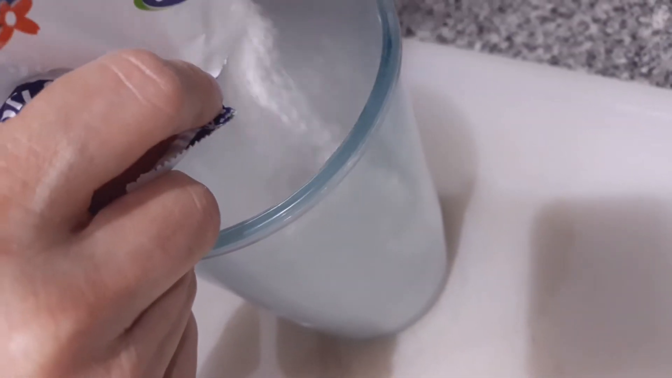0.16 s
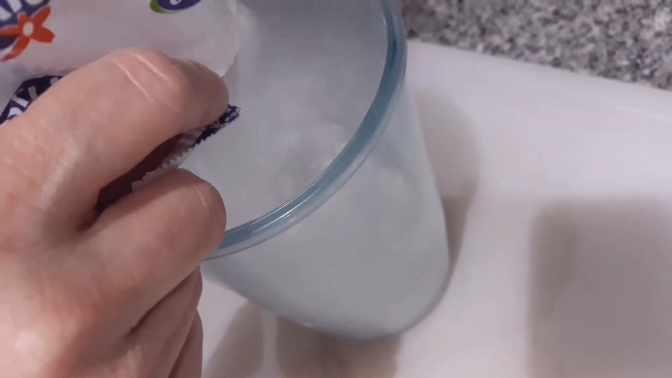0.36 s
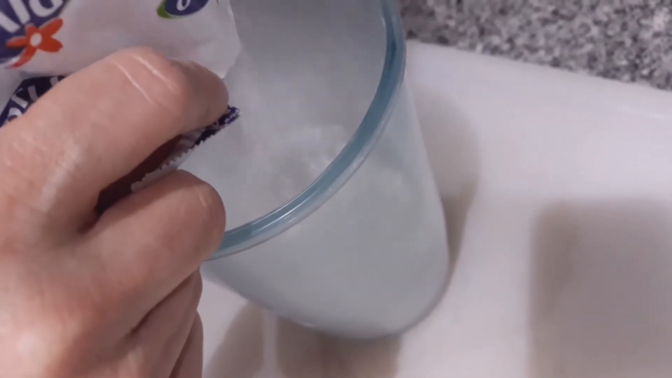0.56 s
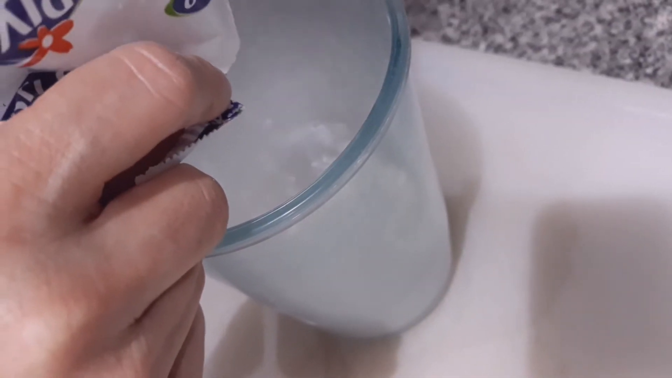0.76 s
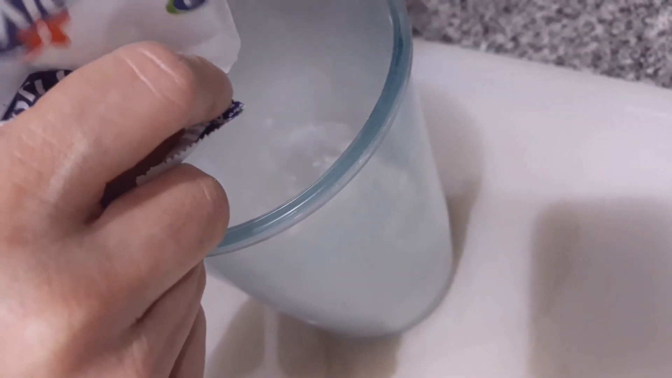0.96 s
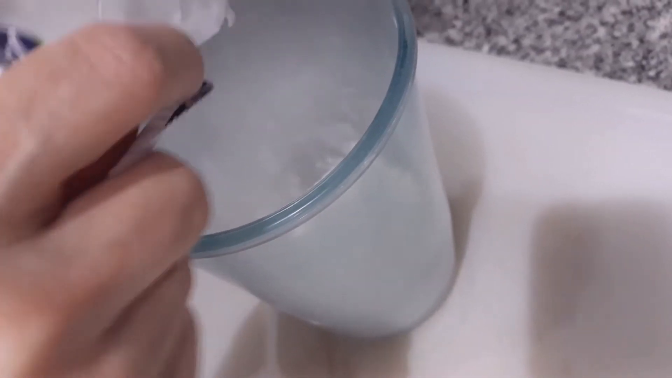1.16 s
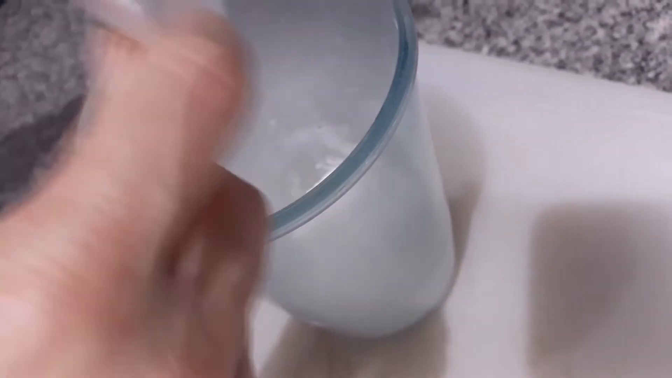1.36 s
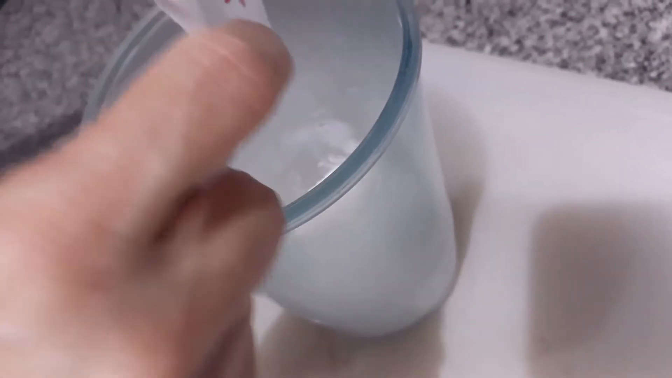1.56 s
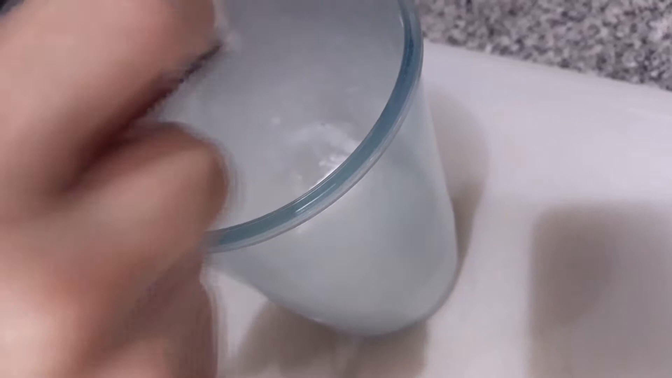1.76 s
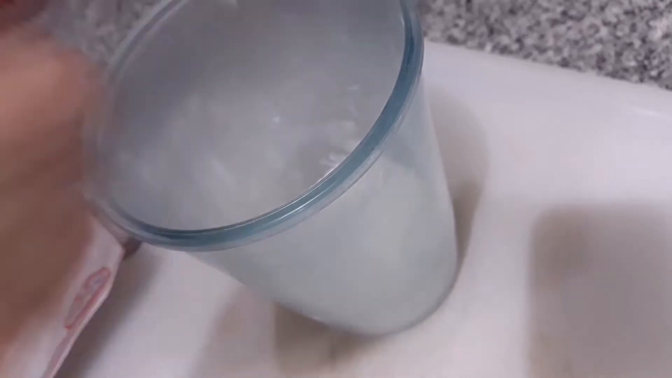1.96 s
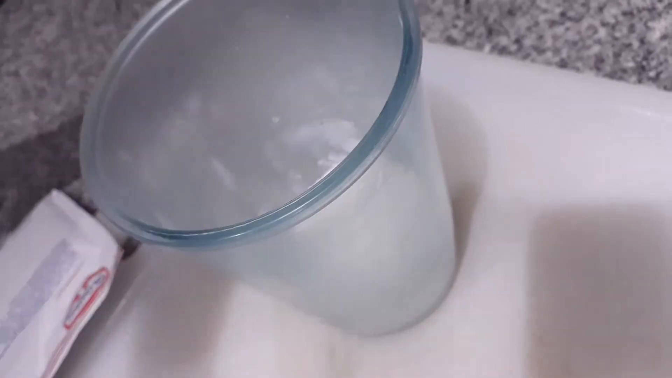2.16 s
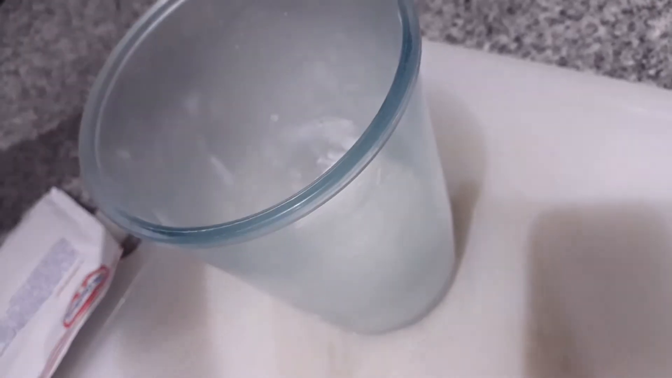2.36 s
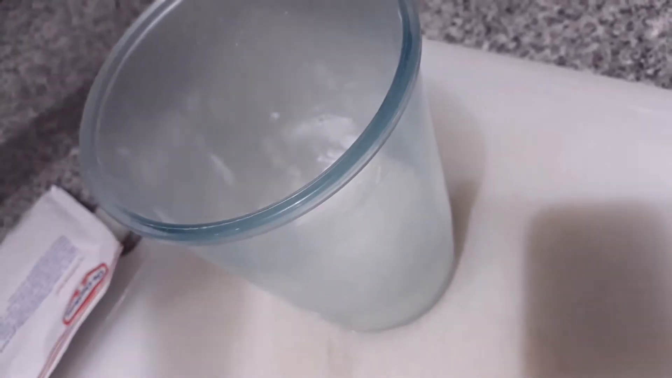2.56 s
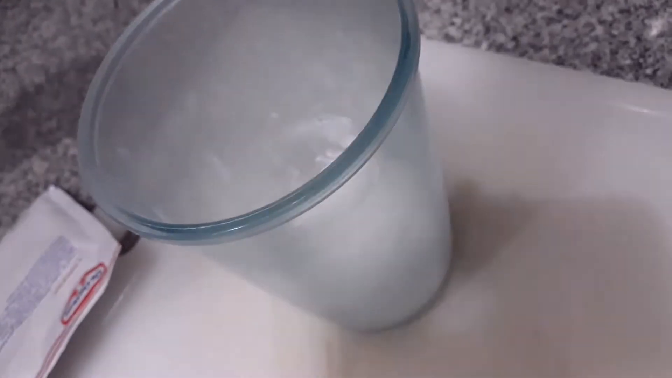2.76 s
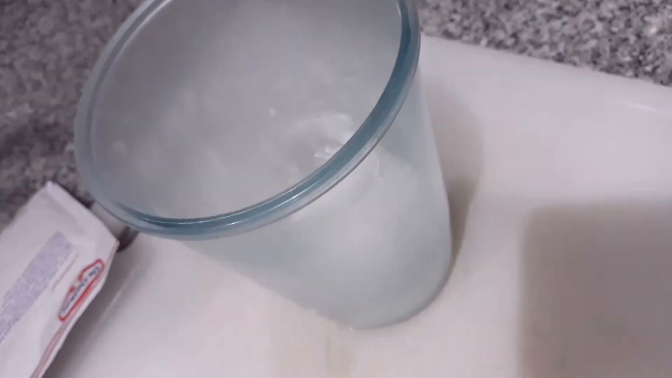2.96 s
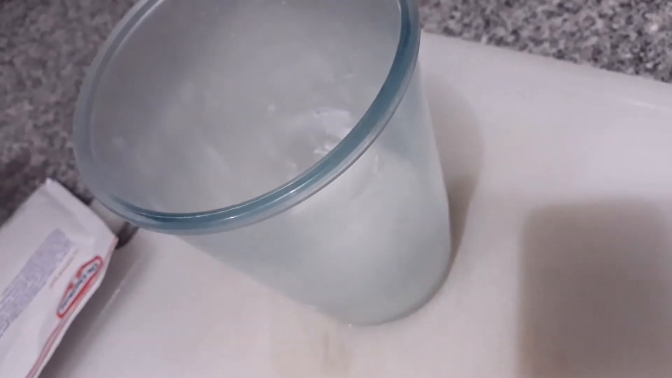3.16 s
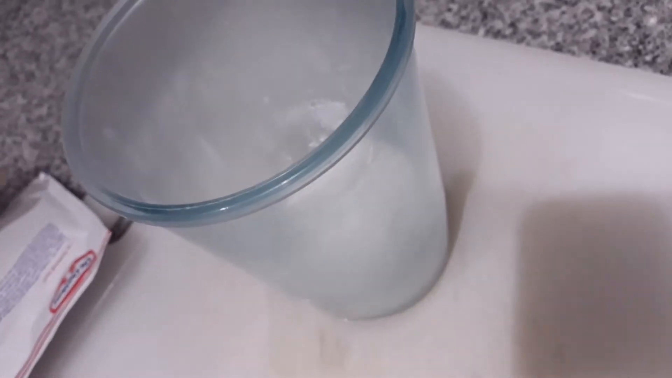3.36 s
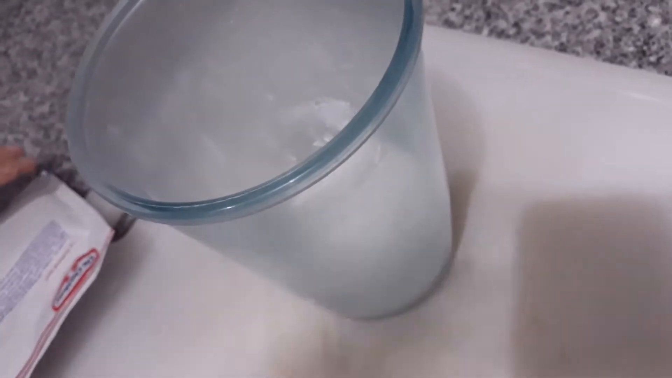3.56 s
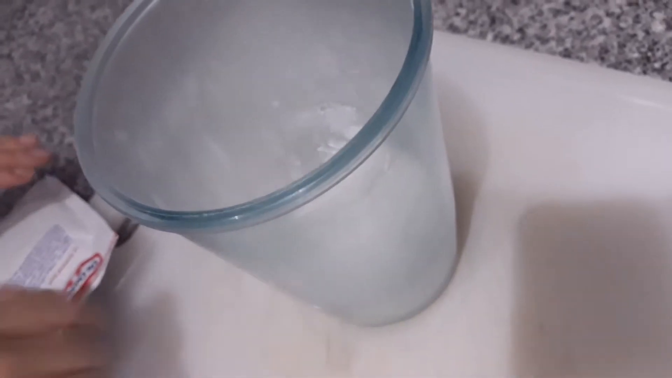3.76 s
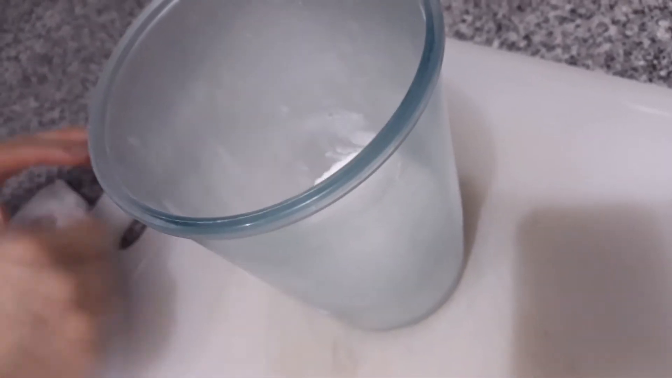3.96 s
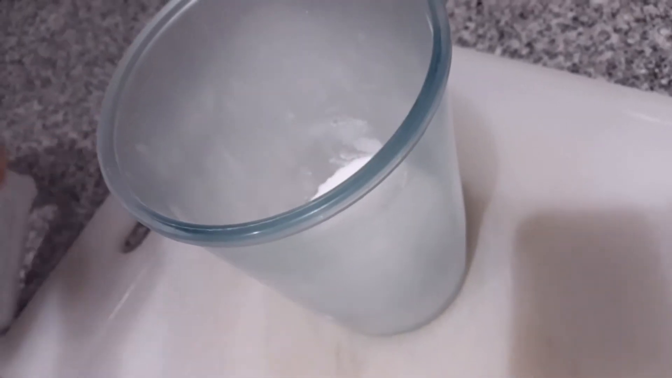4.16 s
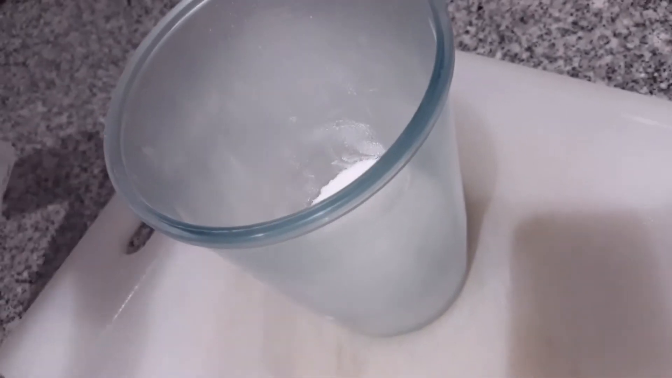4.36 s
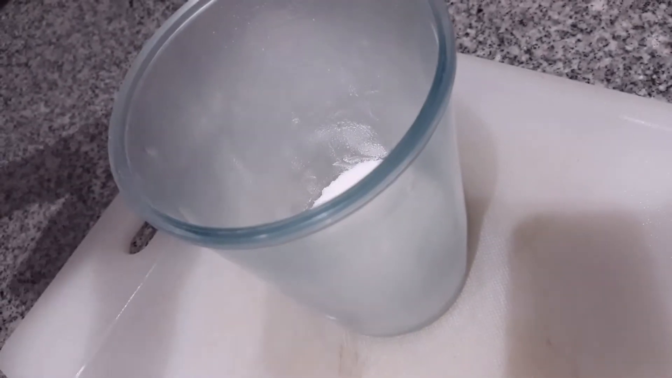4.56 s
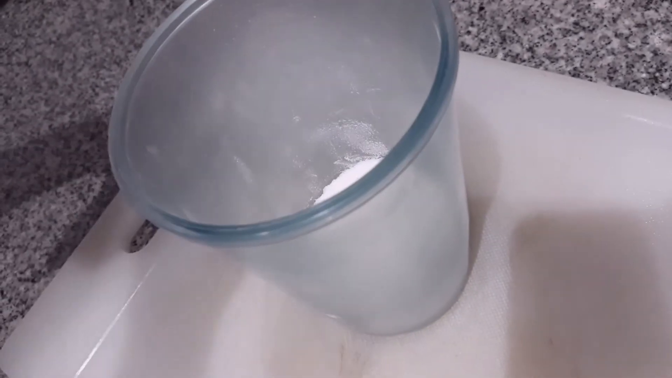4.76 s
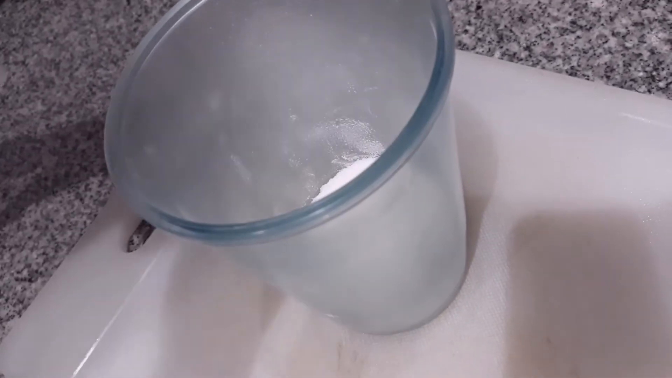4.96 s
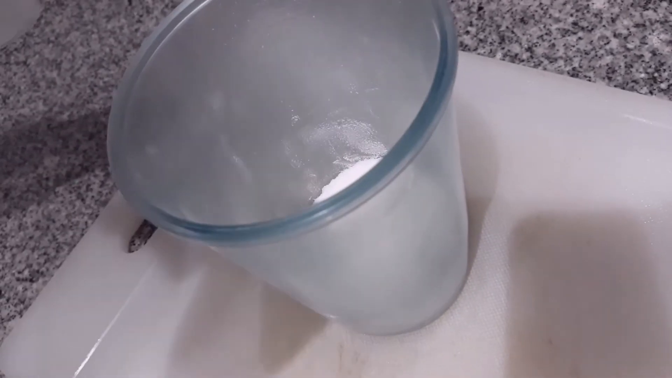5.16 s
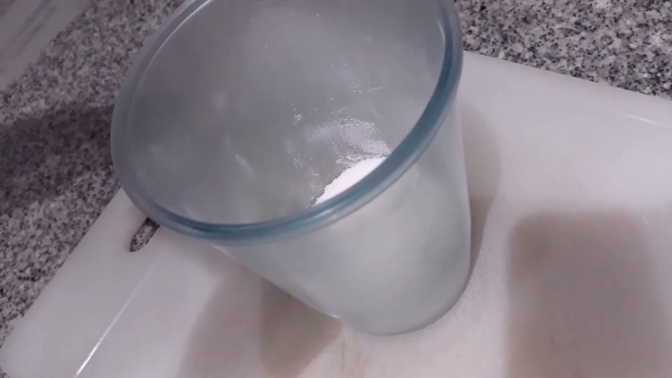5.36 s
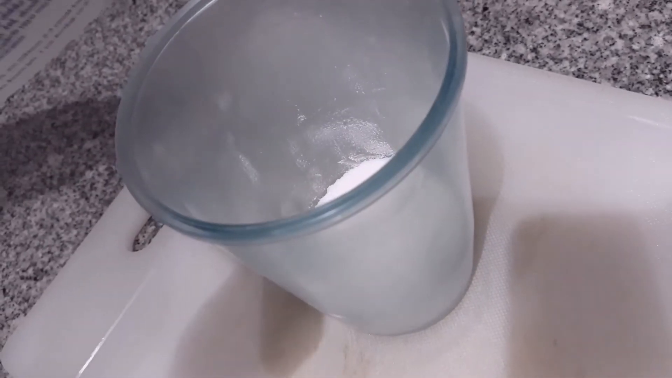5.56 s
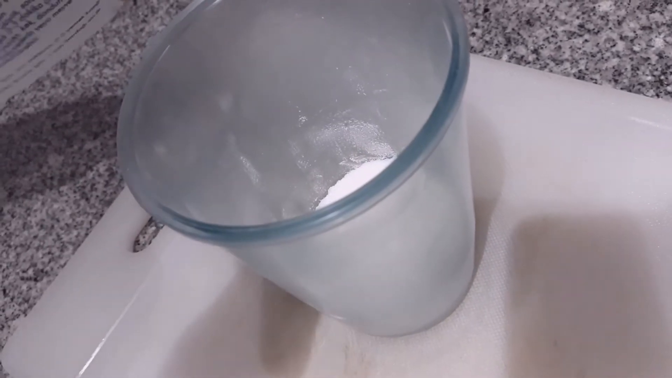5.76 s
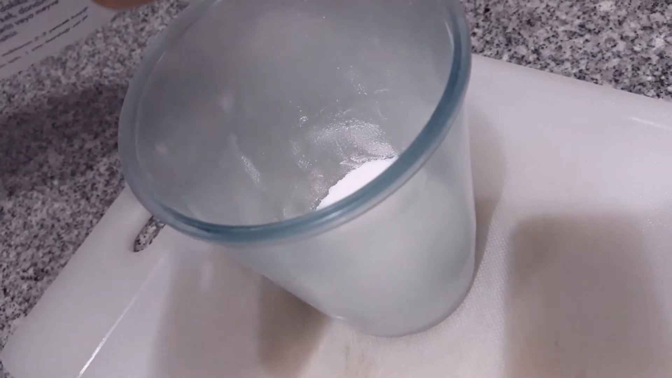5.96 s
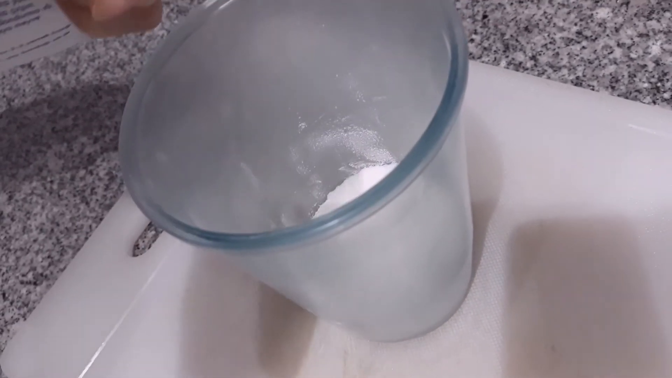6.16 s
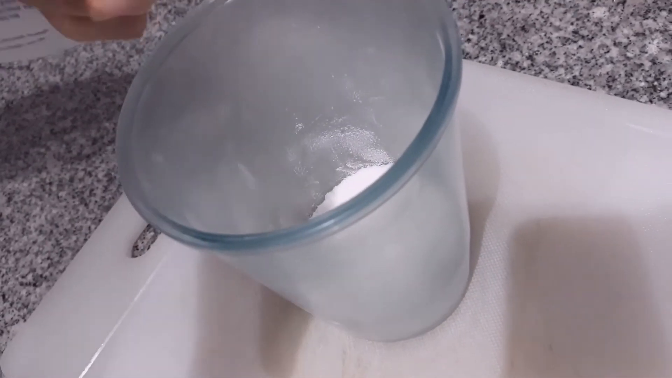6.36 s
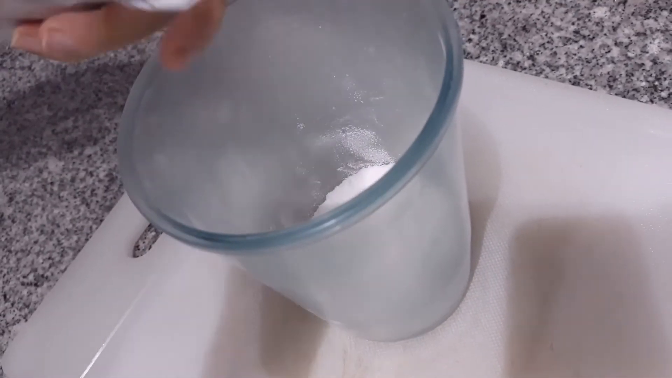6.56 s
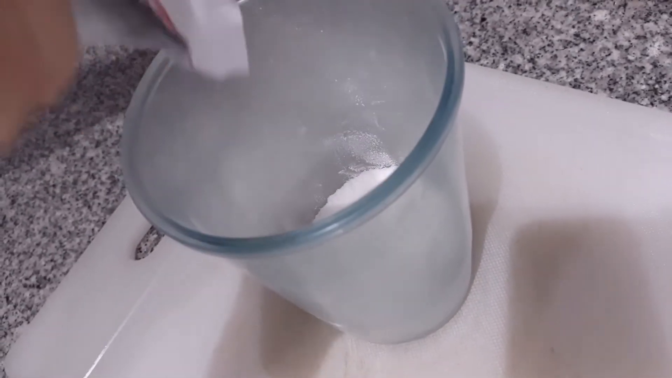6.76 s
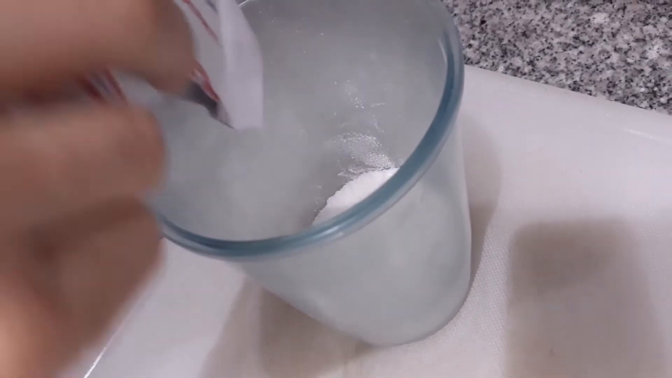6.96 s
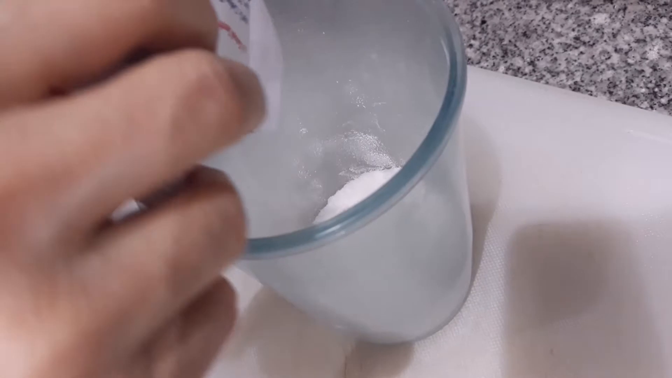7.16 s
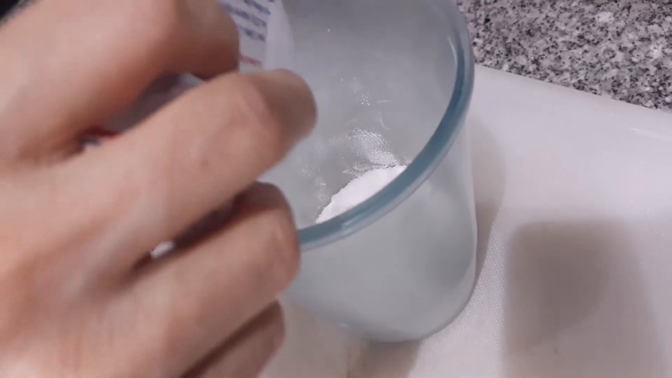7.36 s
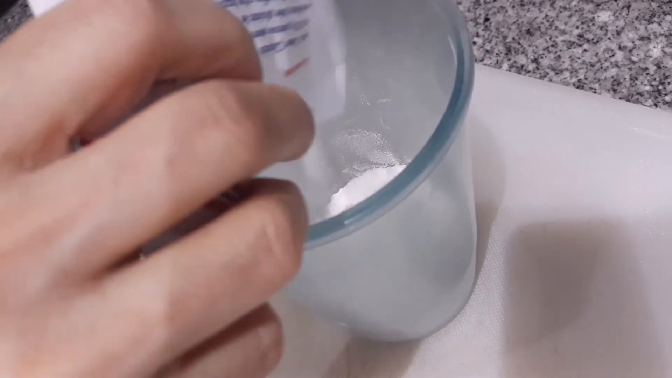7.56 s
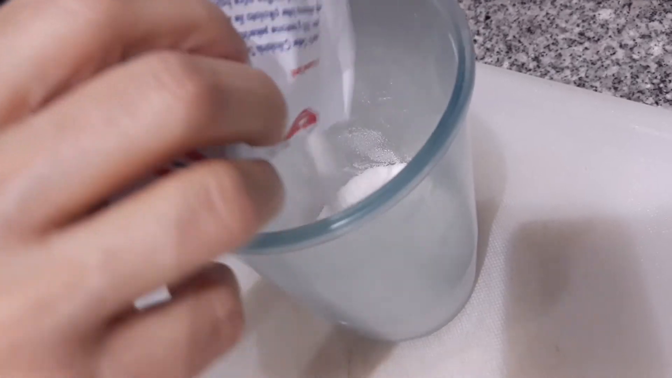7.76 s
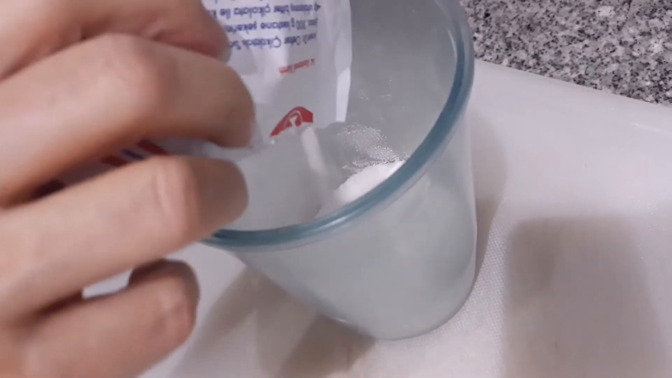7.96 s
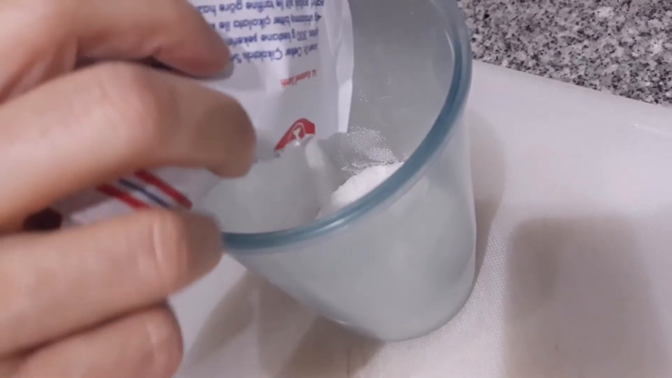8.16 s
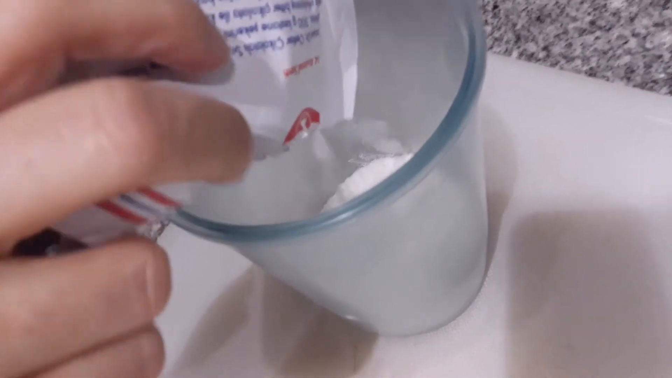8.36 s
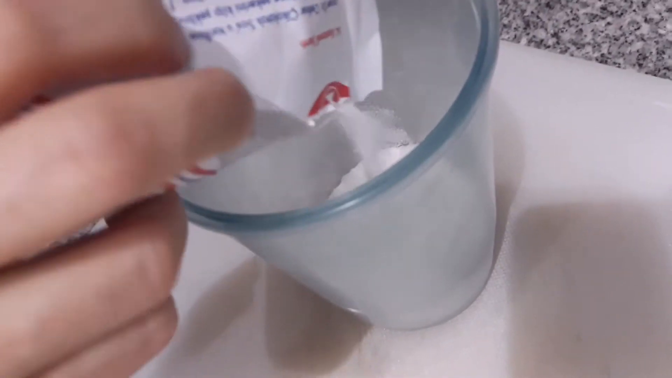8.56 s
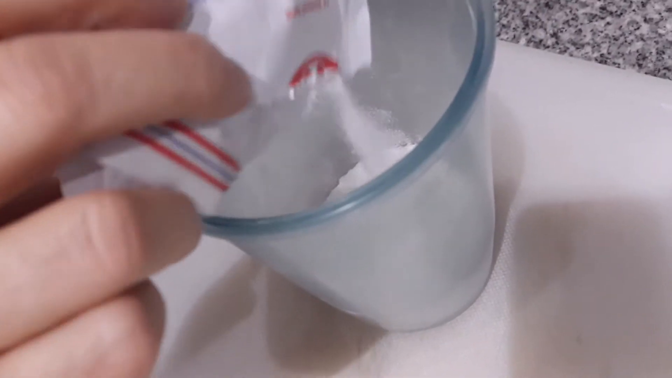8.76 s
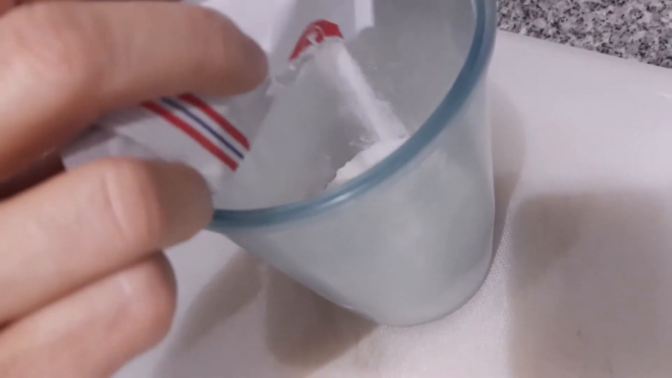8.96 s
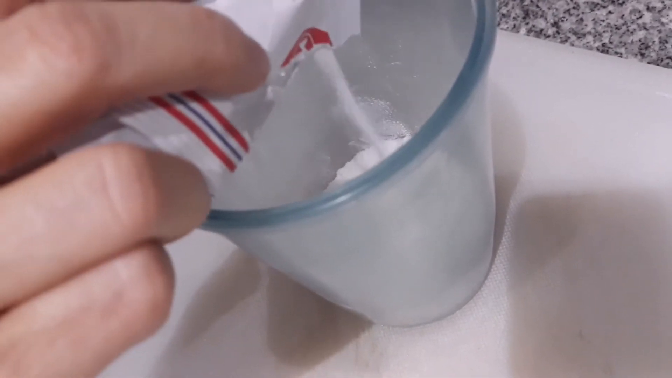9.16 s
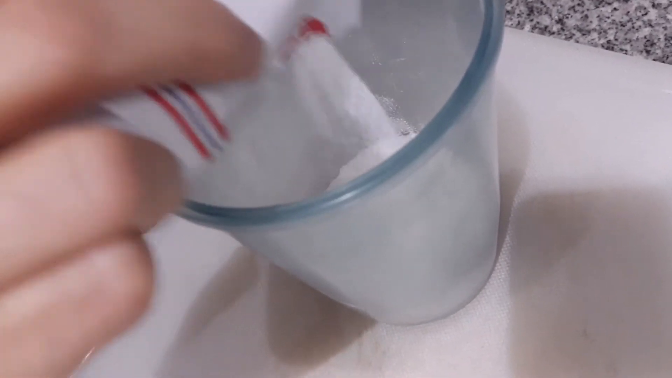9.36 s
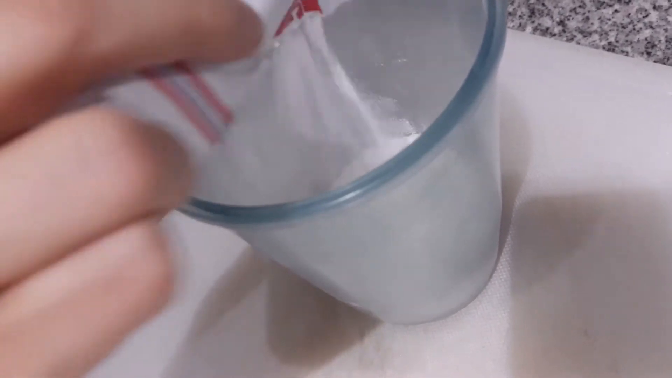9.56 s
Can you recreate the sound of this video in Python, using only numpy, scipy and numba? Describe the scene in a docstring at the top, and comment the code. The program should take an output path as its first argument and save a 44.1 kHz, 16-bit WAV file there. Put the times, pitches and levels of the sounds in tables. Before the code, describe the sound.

A foil packet crackles sharply over a glass, drops on a board, then a paper sachet is torn and powder hisses out, over fridge hum.

```python
"""Creases of a foil packet and a paper sachet buckle in single snaps, while fibres and powder slide in dense tiny
grains. The packet is shaken empty over a tall glass and dropped on the counter; the sachet is picked up, torn open
and tipped in. Noise bursts make the snaps, random ticks and shivers the sliding, and resonances the air in the
glass and the board. A small kitchen answers with echoes made of noise, over a humming fridge and a dull background."""
import sys
import numpy as np
from scipy import signal
from scipy.fft import rfft, irfft
from scipy.io import wavfile
from scipy.ndimage import uniform_filter1d
from numba import njit

SR = 44100
rng = np.random.default_rng(int(sys.argv[2]) if len(sys.argv) > 2 else 0)


def inscribe(sig):
    """Save sig as 16-bit PCM at rate SR to the path in sys.argv[1].

    A 1-D sig is mono; a 2-D sig holds one channel per row.
    Samples are clipped to [-1, 1] before scaling.
    """
    pcm = np.round(np.clip(np.atleast_2d(sig).T, -1, 1) * 32767)
    wavfile.write(sys.argv[1], SR, pcm.astype(np.int16))


N = 423360
TIME = np.arange(N) / SR

# Colour of the kitchen background. Each row: frequency in Hz, relative level in dB.
KITCHEN_COLOUR = [(25, -30), (55, -23.5), (80, -7.5), (150, -11.5), (175, -21.5), (215, -16), (300, -17),
                  (400, -38.5), (500, -25), (650, -43), (830, -32.5), (1100, -48), (2500, -49.5),
                  (16000, -47)]
KITCHEN_DB = -56.5
# Loudness of the fridge hum. Each row: time in seconds, level in dB.
HUM_LEVEL = [(0, -52.5), (1.2, -52), (1.9, -55.5), (3.9, -49.5), (9.6, -51)]
HUM_HZ = 99.2
# How long the kitchen lingers. Each row: frequency in Hz, time to fall by 60 dB in seconds.
ROOM_DECAY = [(150, 0.4), (600, 0.17), (2000, 0.23), (5000, 0.25), (15000, 0.1)]
# Fingers and packet dragging on the board. Each row: middle in seconds, length in seconds, resonance in Hz,
# level in dB before the swell.
BOARD_DRAGS = [(3.045, 0.16, 772, -68), (4.136, 0.11, 770, -47.5), (4.181, 0.063, 800, -38),
               (4.448, 0.18, 617, -43.5), (4.65, 0.062, 830, -54), (4.819, 0.1, 317, -48),
               (5.012, 0.044, 820, -38), (7.795, 0.04, 570, -47)]
# Hand and packet bumping the board. Each row: time in seconds, peak in dB, length of the push in ms.
BOARD_BUMPS = [(0.085, -36, 1.2), (0.297, -32, 2.2), (.492, -32.5, 5.15), (.685, -38.5, 5.2),
               (.703, -32, 1.3), (1.261, -48.5, 1.4), (3.247, -37.5, 2.07), (3.433, -28, 1),
               (3.441, -17, 0.89), (3.472, -25, 0.44), (3.496, -29, 2), (4.157, -23, 0.75),
               (4.471, -36, 2.1), (4.537, -28.5, 1.4), (4.657, -40, 2.3), (4.788, -32.5, 2.8),
               (7.199, -33.5, 1.5), (7.448, -29.5, 1.65), (7.586, -23, 0.8)]
# Cutting board, damped by the counter. Each row: frequency in Hz, relative level in dB.
BOARD_MODES = [(145, -9.5), (205, -7), (236, -9.5), (323, -2), (484, 4), (608, 0.5), (820, -12.5)]
# Air column in the glass. Each row: frequency in Hz, width in Hz, level in dB.
GLASS_MODES = [(565.8, 37, 16.5), (1180, 130, 1.5), (1698, 64, 8), (1993, 130, -15), (2780, 520, 2.5),
               (4600, 1700, 1)]
# Creases buckling. Each row: time in seconds, panel resonance in Hz, level in dB,
# then body and edge in dB relative to that level.
CREASE_SNAPS = [(0.0595, 4030, -50.5, -9, -8), (.084, 4330, -26.5, -1.5, -7.5), (.1045, 825, -53, 11, -8),
                (0.1192, 2050, -39, 5, -13), (.2054, 7700, -43, -23, 3.5), (0.2193, 1260, -32.5, 5.5, -18),
                (.276, 2110, -48, 5, -11), (0.2972, 8750, -26, -9, -3), (0.3189, 1960, -31.5, 4, -7),
                (.3383, 1720, -46, 8.5, -10), (.371, 4390, -39.5, -4, -2), (.491, 2200, -37, 6.5, -17),
                (0.508, 1210, -34, 5.5, -11), (0.5443, 3570, -29.5, 0, -29), (0.7033, 8700, -15, -1, -3.5),
                (0.8867, 4800, -19.5, -7.5, -14), (0.9092, 1200, -37, 2, -8), (1.0167, 8760, -52, -1.5, 4),
                (1.052, 6960, -49, -3.5, 0), (1.0997, 1120, -39, 10.5, -15), (1.222, 8150, -48, -18, 6.5),
                (1.2368, 9150, -26, -4, -4), (1.2601, 2200, -21, -2, -20),
                (1.2683, 4160, -18.5, -11.5, -10), (1.2995, 5160, -24, -9, -2),
                (1.3122, 1700, -28.5, 5.5, -22), (1.3711, 4230, -24, -2, -11),
                (1.3798, 2560, -26.5, -3, -14), (1.3891, 4130, -34, -3, -10), (1.4058, 3600, -26, -9, -13),
                (1.4421, 4300, -30, 0, -5), (1.5334, 2400, -46, 3.5, -18), (1.561, 4300, -46.5, 2.5, -22),
                (1.6494, 5380, -53, -10, -2.5), (1.7373, 2450, -45, 4.5, -10),
                (1.7758, 6500, -38.5, -13, -6.5), (1.8146, 8140, -54.5, 0.5, 4),
                (1.956, 1570, -47.5, 6, -28), (1.972, 1570, -52.5, 6, -23), (2.0333, 1130, -55.5, 9, -26),
                (2.116, 2410, -50.5, -6, -10), (2.2561, 1734, -60, 0, -14.5), (2.9294, 8240, -59, -15.5, 9),
                (3.243, 1870, -50, 5, 2.5), (3.4383, 1650, -32, 2, -3.5), (3.4513, 1200, -44, 0, 4),
                (3.47, 1490, -28, 2.5, -5.5), (3.945, 3250, -47.5, 6.5, -13), (3.9986, 8150, -48, 6, 7.5),
                (4.0657, 714, -43, 4.5, -20), (4.1541, 4130, -28, -3.5, -10),
                (4.1789, 4200, -37.5, -10, -2), (4.3785, 3100, -34.5, -6, -22),
                (4.411, 4500, -39.5, -6, -15), (4.4323, 4430, -34.5, -13, -11),
                (4.4694, 4460, -42, -0.5, -7), (4.511, 2090, -54, 6, -14), (4.536, 4800, -28, -3.5, -6),
                (4.6507, 3360, -37.5, 1, -16), (4.658, 2080, -26, -3.5, -9), (4.748, 5140, -42, -5.5, -7),
                (4.7903, 4970, -41.5, -3.5, 2), (5.0075, 3120, -29.5, -2.5, -24),
                (5.076, 2490, -44, -1, -4), (5.2279, 4080, -26, -12.5, -5.5), (5.257, 2390, -36, 4, -8),
                (5.3456, 4700, -21, -2, 0), (5.5131, 4400, -21, -17, -1), (5.6023, 3880, -18, -6.5, -10.5),
                (6.002, 4030, -43, -7, -7), (6.232, 3760, -48, -15, -13), (6.2984, 3280, -41.5, -2, -15),
                (6.3155, 2540, -39.5, 2.5, -3), (6.3525, 3650, -33.5, -9.5, -29),
                (6.3793, 1770, -57, 16, 0), (6.434, 1700, -39, 6.5, -22), (6.446, 2470, -34, -1, -14),
                (6.4882, 4380, -30, -3, -8.5), (7.1964, 2420, -48, 9, -5), (7.4017, 5370, -34, -12, -11),
                (7.449, 2520, -27.5, -1.5, -10.5), (7.5255, 2650, -25.5, -6, -11.5),
                (7.5846, 1620, -25.5, -2.5, -12), (7.5908, 4180, -28.5, -6, -3),
                (7.6292, 1710, -38.5, 8, -7), (7.6465, 4050, -23, -10.5, -6), (7.9106, 2320, -27, -0.5, -3),
                (8.153, 3860, -36.5, -5, -9), (8.3812, 5510, -42.5, -8, -3), (8.4902, 4640, -32, -10, -9),
                (8.525, 4760, -41, -11, -4), (8.569, 7700, -41.5, -5.5, -1), (8.6382, 4650, -39.5, -15, -3),
                (8.7725, 4630, -43.5, -1, -7), (8.871, 5510, -38.5, -8, -4), (8.896, 7000, -34, -3.5, 0.5),
                (8.9152, 3620, -40, -10, 0), (9.0455, 4430, -39, -3, -18), (9.2596, 2180, -38, 2.5, -26),
                (9.5204, 1230, -42.5, 6.5, -5), (9.5356, 1254, -37.5, 2, -7)]
# Thud, hollow, body, hiss and edge of a snap. Each row: lowest and highest frequency in Hz.
SNAP_BANDS = [(200, 450), (470, 850), (1080, 2550), (2500, 6200), (6600, 16000)]
# Body, lower hiss, upper hiss and edge of the sliding. Each row: lowest and highest frequency in Hz.
SLIDING_BANDS = [(470, 2000), (2000, 3700), (3700, 6500), (6500, 16000)]
# Strokes that rub or tear the wrappers. Each row: start of the hold in seconds, hold in seconds, level in dB,
# then body and edge in dB relative to that level.
HAND_STROKES = [(0, .47, -67, 8, 2), (.095, 0.016, -42, 5, -4), (.27, 0.01, -54, 14, -2),
                (0.303, 0.028, -42.5, 4.5, -3), (.482, 0.051, -52.5, 3, -2), (0.869, 0.1, -50, -0.5, -8.5),
                (1.1, 0.14, -51, -3, -6), (1.22, 0.038, -46, -9, 0), (1.269, 0.022, -32.5, -15, -12),
                (1.33, .1, -40.5, -5, -15), (1.733, 0.011, -57, 7.5, -6), (1.82, 0.016, -57.5, 1, -8),
                (1.89, 0.055, -66, -6, 0), (2.48, 0.058, -80, -6, 11.5), (2.93, .05, -72, -3.5, -5),
                (3.11, .1, -77, -6, 0.5), (3.241, .02, -53.5, 2.5, 2), (3.452, 0.034, -45, 7.5, -3),
                (3.56, .01, -56.5, 1, 2), (3.947, 0.17, -45.5, -0.5, -6), (4.152, .03, -42, 0.5, -5),
                (4.2, 0.13, -49, -5, -5), (4.42, 0.18, -49.5, -4, -4.5), (4.632, 0.054, -47.5, 7.5, -8),
                (4.794, 0.05, -50, -0.5, -5), (4.85, 0.086, -56.5, -8, -3), (4.958, 0.1, -46, -8, -2.5),
                (5.03, 0.047, -41.5, -8.5, -2), (5.1, 0.07, -51.5, -3.5, 1), (5.195, 0.074, -41, -11.5, -1),
                (5.29, 0.062, -36.5, -7, -2), (5.358, 0.048, -27, -6.5, -1.5),
                (5.55, .05, -39, -11.5, -3.5), (5.62, .07, -33.5, -12, -2.5), (5.72, 0.12, -48.5, -9, 5),
                (5.832, 0.028, -34.5, -8.5, 0.5), (5.94, 0.018, -47.5, -1.5, -0.5),
                (6.002, .045, -43.5, -12.5, -1.5), (6.202, .03, -59, 2.5, -3),
                (6.246, 0.05, -44.5, -8.5, -4), (6.34, 0.21, -53, -1.5, -3), (7.044, 0.015, -48, -6, -1.5),
                (8.41, 0.036, -45.5, -9.5, -2), (8.76, 0.016, -47, -8, -2), (8.97, 0.042, -45.5, -20, -1),
                (9.219, 0.024, -43.5, -10, -2), (9.457, 0.036, -38, -11, -3)]
STROKE_ATTACK_S, STROKE_RELEASE_T60_S = 0.017, .2
STILL_DB = -89  # faint rustle of a wrapper at rest
# Powder running down the tipped sachet. Each row: time in seconds, then levels of its hiss, body and treble
# in dB, before POUR_DB is added to all three.
POWDER_POUR = [(6.5, -50, -52, -51), (6.59, -45.5, -60, -50), (6.66, -46.5, -69, -49),
               (6.83, -50.5, -67, -47.5), (7.07, -58, -68, -54), (7.22, -49.5, -53, -50),
               (7.38, -47, -53, -46), (7.55, -50, -50.5, -46.5), (7.89, -47.5, -59.5, -46),
               (8.25, -46.5, -60, -48), (8.62, -47.5, -54, -49), (8.86, -45.5, -53, -48),
               (8.99, -49, -55.5, -47), (9.12, -50.5, -57.5, -48.5), (9.28, -47, -56, -46.5),
               (9.5, -57, -71, -62.5), (9.6, -48, -50, -48)]
POUR_DB = -2.5
# What the hands are doing: shaking the foil packet out, putting it down, picking up the sachet, tearing its top
# off, spreading it open, carrying it to the glass, tipping it, the powder starting to run, coaxing out the rest.
# Each row: start in seconds, scatter of grain sizes in dB, share of the glass's resonance, resonance of the bent
# sheet in Hz, flutter's time to fall by 60 dB in seconds, lower hiss in dB relative to the level, small creases
# in dB over the sliding.
HAND_ACTIONS = [(0, 6.5, 0.51, 3100, .03, -3, 6), (1.5, 3, .4, 3600, 0.046, -2.5, 3),
                (3.9, 3, 0.33, 3400, 0.053, -5.5, 6), (5.15, 2, 0.795, 4600, 0.042, -4.5, -9),
                (6.2, 1.5, .4, 3600, 0.031, -2.5, 1), (6.55, -1, 0.24, 5600, .045, -9, -11),
                (7.15, 0, 0.78, 4690, 0.022, -6, 6), (7.95, -1.5, 0.89, 2950, 0.023, -5, 0.5),
                (8.4, 2, 0.64, 4375, 0.03, -4, 3)]
ACTION_BLEND_S = 0.047


def undb(db):
    """Decibels to gain."""
    return 10 ** (np.asarray(db) / 20)


def unit(x):
    """Scale to an average (rms) strength of 1."""
    return x / np.sqrt(np.mean(x ** 2))


def curves(table):
    """Each column of a table, joined by straight lines in time."""
    s, *columns = np.transpose(table)
    return [np.interp(TIME, s, column) for column in columns]


def wander(rate_hz):
    """Random values, rate_hz of them a second, joined by straight lines."""
    return np.interp(TIME * rate_hz, np.arange(N // 100), rng.standard_normal(N // 100))


def fade(t, t60):
    """Exponential decay, 60 dB down after t60 seconds."""
    return np.exp(-np.log(1000) * t / t60)


def band(x, edges, order=3):
    """Keep only the frequencies between two edges."""
    return signal.sosfilt(signal.butter(order, edges, "bandpass", fs=SR, output="sos"), x)


def resonate(x, hz, width_hz):
    """One resonance, gain 1 at its centre."""
    return signal.lfilter(*signal.iirpeak(hz, hz / width_hz, fs=SR), x)


@njit
def glide(x, hz, q):
    """A resonance whose centre moves, gain 1 at the centre."""
    y, b, low = np.empty(len(x)), 0., 0.
    for i in range(len(x)):
        g = np.tan(np.pi * hz[i] / SR)
        v = (b + g * (x[i] - low)) / (1 + g * (g + 1 / q))
        b, low, y[i] = 2 * v - b, low + 2 * g * v, v / q
    return y


def colour(x, points):
    """Shape a sound by (Hz, dB) points."""
    hz, db = np.transpose(points)
    bins = np.maximum(np.fft.rfftfreq(len(x), 1 / SR), 1)
    gain = undb(np.interp(np.log(bins), np.log(hz), db))
    return irfft(rfft(x) * gain, len(x))


def add(track, s, sound):
    """Mix a short sound into a track at time s."""
    start = int(s * SR)
    track[start:start + len(sound)] += sound[:N - start]


def kitchen(waver=0.33, flutter_db=1, octave_db=-17):
    """A fridge hums at twice the mains frequency over a dull, even background."""
    phase = 2 * np.pi * HUM_HZ * TIME + waver * wander(21)
    tone = unit(np.sin(phase) + undb(octave_db) * np.sin(2 * phase))
    hum = tone * undb(curves(HUM_LEVEL)[0] + flutter_db * wander(4.5))
    return hum + undb(KITCHEN_DB) * unit(colour(rng.standard_normal(N), KITCHEN_COLOUR))


def room(x, early_db=-8.5, early_t60=0.061, late_db=-13):
    """Counter and tiles answer at once; then each band's energy lingers in the kitchen as a diffuse wash."""
    t = TIME[:SR // 12]
    echoes = rng.standard_normal(len(t)) * fade(t, early_t60) * (t > .002)
    reflections = unit(echoes) / np.sqrt(len(t))
    out = x + undb(early_db) * signal.fftconvolve(x, reflections)[:N]
    far = np.pad(x, (SR // 120, 0))[:N]  # the wash sets in a little later
    edges = np.geomspace(140, 17000, 15)
    for lo, hi in zip(edges, edges[1:]):
        t60 = np.interp(np.sqrt(lo * hi), *np.transpose(ROOM_DECAY))
        keep = fade(1 / SR, t60) ** 2  # share of the energy left after one sample
        energy = signal.lfilter([1 - keep], [1, -keep], band(far, (lo, hi)) ** 2)
        wash = unit(band(rng.standard_normal(N), (lo, hi)))
        out = out + undb(late_db) * np.sqrt(energy) * wash
    return out


def handling(moving, gain_db=-12, follow=0.38, rest_db=-46):
    """Fingers working the wrapper add a soft low rub that swells with the sliding."""
    rub = unit(band(rng.standard_normal(N), (140, 340)))
    return rub * undb(gain_db + rest_db + follow * (moving[0] - rest_db))


def drags(slips_per_s=400, q=4.3):
    """Skin and paper slip in small uneven jerks that ring one low resonance."""
    out = np.zeros(N)
    t = TIME[:SR // 4]
    for (s, length, hz, db), chance in zip(BOARD_DRAGS, rng.random((len(BOARD_DRAGS), len(t)))):
        slips = (chance < slips_per_s / SR) * 1.
        swell = np.sin(np.pi * np.minimum(t / length, 1)) ** 2
        rung = resonate(resonate(slips, hz, hz / q), hz, hz / q)
        add(out, s - length / 2, undb(db) * swell * unit(rung))
    return out


def bumps(scuff_db=2, scuff_t60=0.028):
    """A soft, scuffing push thuds on the board; the longer the push, the duller the knock."""
    out = np.zeros(N)
    t = np.arange(SR // 4) / SR
    ring = sum(undb(db) * np.cos(2 * np.pi * hz * t) * fade(t, 26 / hz) for hz, db in BOARD_MODES)
    for (s, db, push_ms), noise in zip(BOARD_BUMPS, rng.standard_normal((len(BOARD_BUMPS), len(t)))):
        scuff = undb(scuff_db) * unit(band(noise, (130, 900))) * fade(t, scuff_t60)
        push = np.sin(np.pi * np.minimum(t * 1000 / push_ms, 1)) ** 2
        pushed = signal.fftconvolve(ring + scuff, push)[:len(t)]
        knock = band(pushed, (110, 3000), order=2)
        add(out, s, undb(db) * knock / np.abs(knock).max())
    return out


def glass(x):
    """The air in the glass gives back a sound at its own resonances."""
    return sum(undb(db) * resonate(x, hz, width) for hz, width, db in GLASS_MODES)


def actions():
    """Each column of the hands' actions, held until the next action and blended into it."""
    s, *columns = np.transpose(HAND_ACTIONS)
    current = np.searchsorted(s[1:], TIME)
    return [uniform_filter1d(column[current], int(ACTION_BLEND_S * SR)) for column in columns]


def stroke(t, hold_s):
    """A quick swell up to t = 0, a hold and an exponential release."""
    swell = np.exp(-(np.minimum(t, 0) / STROKE_ATTACK_S) ** 2)
    return swell * fade(np.maximum(t - hold_s, 0), STROKE_RELEASE_T60_S)


def movement():
    """Strokes and pouring add in power: level dB of the sliding, with its body and edge dB relative to that."""
    begins, ends = POWDER_POUR[0][0], POWDER_POUR[-1][0]
    pour = undb(np.array(curves(POWDER_POUR)) + POUR_DB) * stroke(TIME - begins, ends - begins)
    power = undb(STILL_DB) ** 2 + pour ** 2
    lead_s = .05  # room for the swell before the hold
    for s, hold_s, db, body_db, edge_db in HAND_STROKES:
        start = max(s - lead_s, 0)
        shape = stroke(TIME[:SR] + start - s, hold_s)
        for track, rel in zip(power, [0, body_db, edge_db]):
            add(track, start, (undb(db + rel) * shape) ** 2)
    level, body, edge = 10 * np.log10(power)
    return level, body - level, edge - level


def ticks(count=15, start_s=7.0, end_s=7.9, tick_db=-40, scatter_db=2, tick_t60=0.054):
    """The emptying sachet relaxes in small bright ticks at uneven intervals."""
    out = np.zeros(N)
    t = TIME[:SR // 25]
    for k, (size, *noise) in enumerate(rng.standard_normal((count, len(t) + 1))):
        s = start_s + (end_s - start_s) * (k + rng.random()) / count
        tick = unit(band(noise, (2200, 11000), order=1)) * fade(t, tick_t60)
        add(out, min(s, TIME[-1]), undb(tick_db + scatter_db * size) * tick)
    return out


def sliding(hands, moving, grains_per_s=1700, grain_t60=.005, tick=3, catch_db=2.0, catch_hz=70,
            flicker_db=1.85, sheet_db=-3, flex=0.039, hiss_db=-1):
    """Thousands of tiny slips and impacts of uneven size make a hiss that catches and lets go."""
    scatter_db, glass_share, sheet_hz, _, lower_db, _ = hands
    db, body_db, edge_db = moving
    sizes = undb(scatter_db * np.minimum(rng.exponential(size=N), 6.5))
    grains = sizes * rng.choice([-1, 1], N) * (rng.random(N) < grains_per_s / SR)
    # each grain is a tick followed by its own short shiver of the sheet
    shiver_power = signal.fftconvolve(grains ** 2, fade(TIME[:SR // 30], grain_t60) ** 2)[:N]
    shiver = np.sqrt(np.abs(shiver_power))
    x = unit(tick * unit(grains) + 3 * unit(shiver * rng.standard_normal(N)))
    x = x + .4 * rng.standard_normal(N)  # a smooth hiss beneath the grains
    # the level over a twelfth of a second is left to the hand's movement
    x = x / np.sqrt(uniform_filter1d(x ** 2, SR // 12))
    x = x * undb(catch_db * wander(catch_hz))
    # the bent sheet's resonance wavers
    x = x + undb(sheet_db) * glide(x, sheet_hz * np.exp(flex * wander(9)), 9.0)
    x = (x + glass_share * glass(x)) / np.sqrt(1 + glass_share ** 2)
    bands_db = [body_db, lower_db, hiss_db, edge_db]
    tone = sum(undb(rel + flicker_db * wander(25)) * unit(band(x, edges))
               for edges, rel in zip(SLIDING_BANDS, bands_db))
    return undb(db) * tone


def crinkles(hands, moving, count=1100, peak_db=-1, scatter_db=3, cycles=16):
    """Small creases give way at random while the sheet moves, each briefly ringing at its own pitch."""
    out = np.zeros(N)
    t = TIME[:SR // 40]
    level_db = moving[0] + hands[-1]
    for when, pitch, size, partner in rng.random((count, 4)):
        i = int(when * (N - 1))
        hz = 1100 * 7 ** pitch
        ring = (np.sin(2 * np.pi * hz * t) + np.sin(2 * np.pi * hz * (1 + partner) * t)) / 2
        db = level_db[i] + peak_db + scatter_db * min(-np.log(1 - size), 2)
        add(out, i / SR, undb(db) * ring * fade(t, cycles / hz))
    return out


def snaps(hands, crack_t60=0.00033, crack_db=11, panel_db=1, glass_db=-4, hollow_db=-8, thud_db=-13,
          harden=0.28, soft_db=-40, faint_copy_db=-30, faint_copy_lead_s=0.015):
    """A crease flips with a crack; the sheet flutters briefly and favours the pitch of the flipped panel."""
    out = np.zeros(N)
    t = np.arange(SR // 12) / SR
    _, glass_share, _, flutter_t60, _, _ = hands
    attack = SR // 100  # the level counts all of a band's energy as if it fell within 10 ms
    noises = rng.standard_normal((len(CREASE_SNAPS), len(t)))
    for (s, hz, db, body_db, edge_db), noise in zip(CREASE_SNAPS, noises):
        i = int(s * SR)
        burst = noise * (undb(crack_db) * fade(t, crack_t60) + fade(t, flutter_t60[i]))
        burst = burst + undb(panel_db) * resonate(burst, hz, hz / 3.5)
        burst = burst + glass_share[i] * undb(glass_db) * glass(burst)
        low_db = body_db + hollow_db - harden * (db - soft_db)  # the harder the snap, the less hollow it is
        bands_db = [low_db + thud_db, low_db, body_db, 0, edge_db]
        sound = sum(undb(rel) * unit(band(burst, edges)) for edges, rel in zip(SNAP_BANDS, bands_db))
        sound = undb(db) * np.sqrt(attack / len(t)) * sound
        add(out, s, sound)
        # a much fainter copy of the snap sounds shortly before it
        add(out, s - faint_copy_lead_s * (.5 + rng.random()), undb(faint_copy_db) * sound)
    return out


def scene():
    """Packets, powder and board sound in the kitchen."""
    hands, moving = actions(), movement()
    board = bumps() + drags()
    wrappers = snaps(hands) + crinkles(hands, moving) + sliding(hands, moving) + ticks()
    return (room(wrappers + board) + handling(moving) + kitchen())[None]


def record(dry):
    """The microphone's top octave sits on a lower shelf; the sharpest peaks are rounded and the top ends steeply."""
    presence_db, shelf_db, top_db, top_hz = 2.5, -6, -3.5, 15950
    corners_hz = [100, 6000, 8500, 9400, 11500, 12800, 15500]
    response = list(zip(corners_hz, [0, 0, presence_db, shelf_db, shelf_db, top_db, top_db]))
    rounded = np.tanh(colour(dry[0], response))
    low_pass = signal.ellip(10, .2, 70, top_hz, fs=SR, output="sos")
    return signal.sosfilt(low_pass, rounded)[None]


dry = scene()
out = record(dry)
inscribe(out)
```